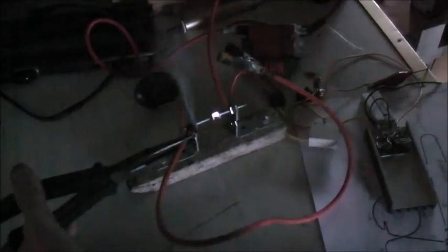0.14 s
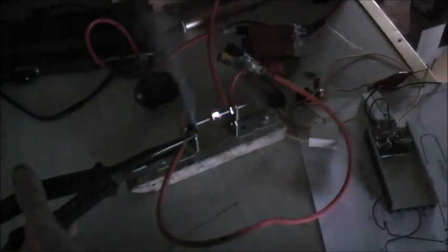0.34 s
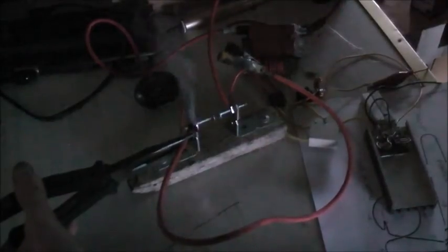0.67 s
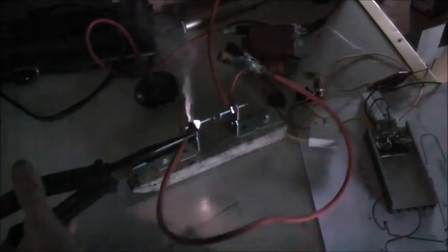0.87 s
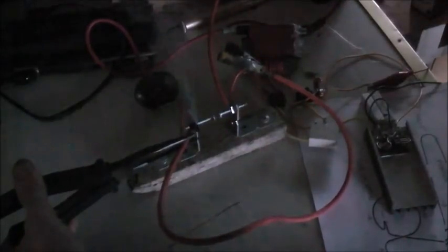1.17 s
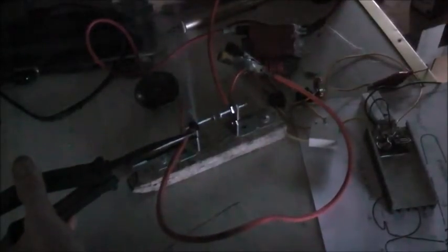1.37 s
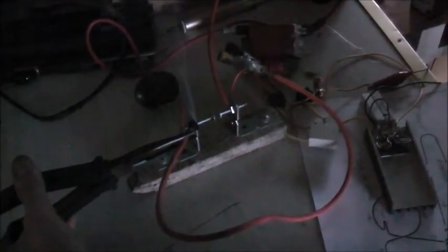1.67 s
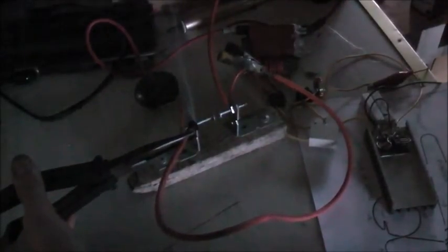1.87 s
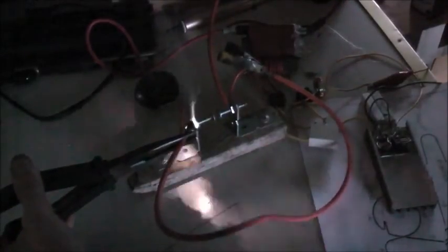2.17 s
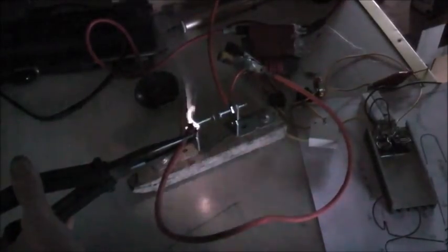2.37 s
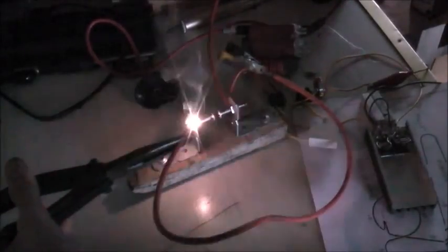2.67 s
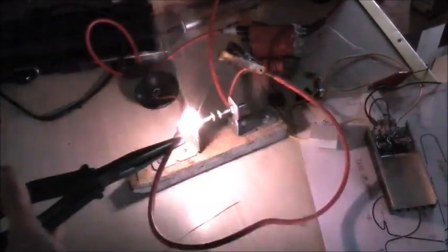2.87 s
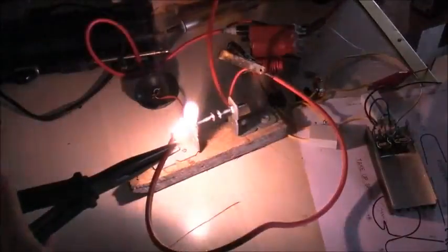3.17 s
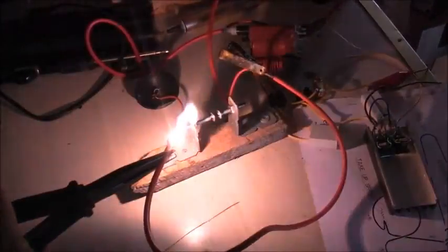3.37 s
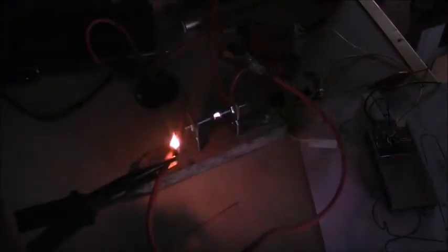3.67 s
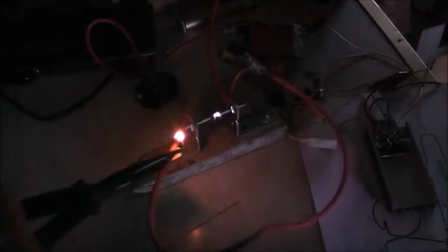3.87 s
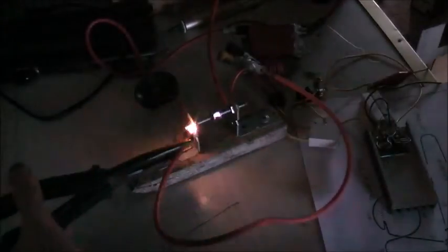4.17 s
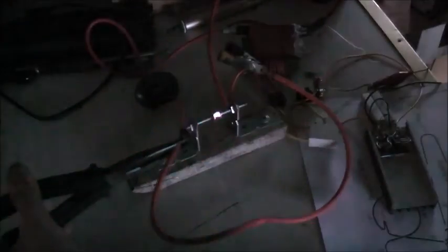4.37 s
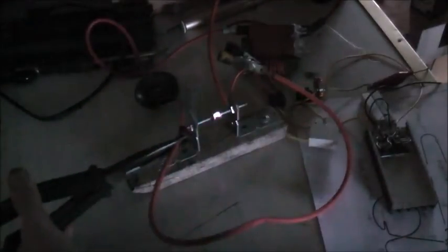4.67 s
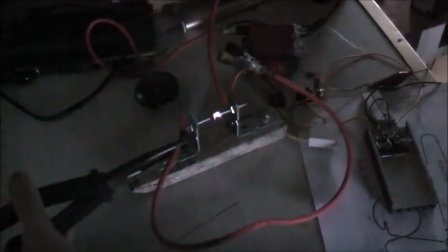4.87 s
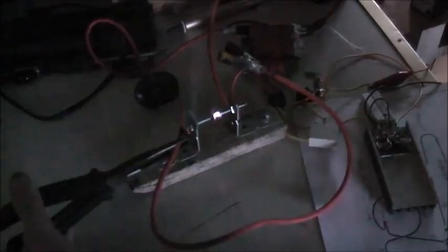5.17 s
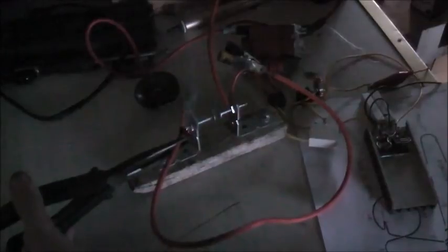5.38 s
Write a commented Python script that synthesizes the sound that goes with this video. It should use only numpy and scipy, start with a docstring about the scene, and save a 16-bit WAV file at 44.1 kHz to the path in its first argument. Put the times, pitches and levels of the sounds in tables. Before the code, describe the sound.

An electric arc held with tongs spits and crackles over a piercing steady whine, with pauses where only the whine, dull handling bumps and clinks remain. The whine cuts as a flame swells into a fierce fluttering hiss with snaps. Afterwards it is quiet, with tiny sparks and distant echoing bird whistles; one loud crack restarts sputter and whine. Small room, close microphone, dull background murmur.

```python
"""An electric arc on a workshop floor sputters in bursts, then burns as a roaring flame: flickering noise.
Its switched high-voltage supply whines while it runs: a gliding sine with overtones that beat.
Sparks snap as short noise bursts, and bumps by the operator's hand ring the housing's low modes.
Scuffs, clicks, clinks and faint leakage ticks join in; a far bird's falling, echoing whistles come
from outside, over a murmur of air and electronics."""
import sys
import numpy as np
from scipy import signal
from scipy.fft import rfft, irfft, next_fast_len
from scipy.io import wavfile
from scipy.ndimage import uniform_filter1d, map_coordinates

SR = 44100
rng = np.random.default_rng(int(sys.argv[2]) if len(sys.argv) > 2 else 0)


def wrap_up_sound(samples):
    """Save the sound to the file named by the first command line argument, as 16-bit audio."""
    columns = np.atleast_2d(samples).T
    # keep every value between -1 and 1, then stretch to whole-number steps
    tamed = np.clip(columns, -1, 1)
    steps = np.round(tamed * 32767).astype(np.int16)
    wavfile.write(sys.argv[1], SR, steps)


N = 244314  # length in samples

# Colour of the murmur: [f/Hz, level/dB per Hz]
AIR_TONE = [(20, -56), (47, -7), (267, -3.5), (453, -6.5), (1420, -15.5), (2600, -21.5), (7000, -23.5),
            (8800, -28), (9400, -21), (15600, -30.5)]
# Murmur level before its slow drift; it dips after the flame: [t/s, level/dB]
AIR_LEVEL = [(0, -53), (1.5, -51), (3.6, -52), (3.78, -55.5), (4.3, -54), (5.54, -50.5)]
# How alike the murmur is at left and right: [f/Hz, likeness 0 to 1]
AIR_LIKENESS = [(60, 0.58), (950, 0.19), (4000, 0.65), (15000, 1)]

# Relative strength of the leakage ticks: [t/s, level/dB]
CORONA_LEVEL = [(.45, -55), (.55, -68.5), (4.2, -66.5), (5.3, -57.5)]
# Colour of the leakage ticks: [f/Hz, level/dB per Hz]
CORONA_TONE = [(3000, -19), (4500, -3.5), (5800, 9.0), (7500, -8), (11000, -40)]

# Falling whistles, before husk and echo: [t/s, length/s, start f/Hz, end f/Hz, level/dB]
WHISTLES = [(-.13, 0.23, 2320, 1505, -45.5), (0.186, 0.16, 2318, 2017, -49),
            (0.392, 0.16, 2160, 1683, -52.5), (0.666, 0.13, 1800, 1490, -52.5),
            (0.765, 0.22, 2272, 1975, -50.5), (1.04, 0.18, 2224, 1926, -49),
            (1.252, 0.26, 2086, 1487, -45.5), (1.737, 0.24, 1977, 1383, -52.5),
            (2.289, 0.27, 2258, 1873, -48.5), (2.613, 0.14, 2240, 1690, -50.5),
            (2.941, 0.18, 2098, 1690, -51.5), (3.481, 0.079, 2050, 1900, -47),
            (3.768, 0.27, 2180, 1523, -52), (3.891, 0.2, 2118, 1882, -53), (4.37, 0.21, 2218, 1686, -56.5)]
LEAD_S = .2  # whistles that begin early bring their echo along

# Electrical breakdowns, before the path loss on the crack: [t/s, crack level/dB, pop level/dB against the crack]
SPARKS = [(.019, -37.5, -15), (0.168, -40, -25), (0.2172, -36, -34), (0.3329, -36.5, -28),
          (0.3511, -34, -33), (0.4675, -15.5, -16), (2.708, -27, -13), (3.0264, -35.5, 2.5),
          (3.125, -37, 2.5), (3.5569, -21.5, -2), (3.6569, -21, 1), (3.936, -40, -13.5), (4.37, -40.5, -29),
          (4.4051, -42.5, 1), (4.5086, -36.5, -29.5), (4.936, -36.5, -16), (5.055, -35.5, -30),
          (5.299, -33.5, -31), (5.324, -18, -11.5)]
# Colour of crack and fizz: [f/Hz, level/dB per Hz]
SNAP_TONE = [(2500, -25.5), (4000, -7.5), (5700, -1), (6600, -4.5), (8800, -2), (9500, -1.5),
             (11500, -12.5), (16500, -13)]
# Colour of the duller pop: [f/Hz, level/dB per Hz]
POP_TONE = [(60, -32), (250, -2), (900, -9.5), (1400, -1.5), (3000, -2), (5000, -17.0)]
CRACK_T60_S, FIZZ_T60_S, POP_T60_S = 0.014, 0.076, 0.037  # times to fade by 60 dB
FIZZ_DB = -10  # against the crack

# Soft knocks, before each one's random changes: [t/s, level/dB, extra level/dB of the mode near 163 Hz]
BUMPS = [(0.473, -25.5, -5.5), (0.558, -34.5, -32), (.668, -39.5, -12), (0.764, -41, -22),
         (1.198, -36.5, -21), (1.259, -39.5, -20), (1.324, -27.5, -18), (1.383, -29.5, -16),
         (1.426, -38.5, -13), (1.469, -33.5, -16), (1.557, -30.5, -26), (1.873, -35, -22),
         (2.066, -31, -25), (2.145, -34.5, -31), (2.192, -32, -37), (2.219, -31, -37), (5.345, -30, -13),
         (5.396, -24.5, -6), (5.463, -34, -6), (5.496, -40, -19)]
# Ringing modes of the housing: [f/Hz, width/Hz, level/dB, left over right/dB]
HOUSING_MODES = [(86, 9.8, -12, -4), (163.4, 8.8, 8, -1), (268, 12.6, 0.5, 2.5), (364.4, 21.2, -5, 10.5),
                 (462, 48, -8.5, 6), (663, 68, -2.5, 1)]
# Dull noise of the contact: [f/Hz, level/dB per Hz]
THUD_TONE = [(50, -28), (150, 6.5), (350, 3.5), (900, -10), (1800, -21.5)]
THUD_DB, THUD_T60_S = -7.5, 0.15  # level against the bump; time to fade by 60 dB

# Supply switched on and off: [full swing t/s, off t/s]
RUNS = [(0.552, 2.7), (5.409, 5.52)]
GROWS_DB_PER_S, DIES_DB_PER_S = 1100, 480
# Switching rate, pulled down as the arc loads the supply: [t/s, f/Hz]
SWITCHING_RATE = [(.54, 14290), (.58, 14335), (.68, 14355), (.705, 14305), (.775, 14300), (.795, 14350),
                  (.87, 14275), (.93, 14298), (1.12, 14308), (1.17, 14255), (1.21, 14370), (1.245, 14305),
                  (1.275, 14382), (1.47, 14418), (2.0, 14427), (2.25, 14425), (2.275, 14335), (2.35, 14283),
                  (2.455, 14315), (2.485, 14243), (2.58, 14250), (2.66, 14228), (2.69, 14165), (5.4, 14245),
                  (5.47, 14240), (5.54, 14200)]
# Loudness of the core, before its small wobble: [switching f/Hz, level/dB]
CORE_LEVEL = [(14165, -29.5), (14235, -21.5), (14265, -23.5), (14305, -19), (14350, -20), (14385, -23),
              (14425, -22.5)]
# A faster clock sags too under heavy load: [switching f/Hz, clock f/Hz]
CLOCK_RATE = [(14250, 66250), (14345, 66560)]
# Overtones that beat with the clock: [whine multiple, clock multiple, level/dB before BEAT_LEVEL]
BEATS = [(4, 1, -3), (5, 1, -8), (9, 2, -9.5)]
# Beats against the whine: [switching f/Hz, single-clock level/dB, double-clock level/dB]
BEAT_LEVEL = [(14242, -33, -27), (14254, -32, -62), (14395, -33, -62), (14414, -31, -33)]

# Steady part of the sputter, one list per spell, before flicker and path loss: [t/s, level/dB]
SPUTTER = [
    [(.67, -43.5), (.9, -39), (1.07, -39), (1.2, -43), (1.3, -54)],
    [(2.25, -42), (2.5, -41), (2.58, -47.5), (2.7, -41.5)],
    [(5.33, -40), (5.4, -52.5), (5.45, -72), (5.47, -57), (5.54, -40)],
]
# Sudden spitting on top, before flicker and path loss: [t/s, level/dB, hold/s]
BURSTS = [(.672, -27.5, 0.0024), (.688, -35, 0.017), (.723, -31, 0.004), (.759, -33.5, 0.018),
          (.796, -37, 0.0096), (.848, -34.5, 0.026), (.922, -45, 0.041), (.958, -40.5, 0.04),
          (1.094, -34.5, 0.093), (1.233, -32.5, 0.017), (1.875, -33.5, 0.0031), (2.258, -25.5, 0.0093),
          (2.311, -31, 0.0075), (2.41, -42, 0.019), (2.44, -36, 0.038), (2.798, -33, 0.01),
          (2.815, -36, 0.0068), (2.893, -37, 0.0057), (2.961, -27.5, 0.0087), (5.356, -38, 0.025),
          (5.456, -34, 0.05), (5.51, -32.5, 0.017)]
# Steady part of the flame, before flicker and path loss: [t/s, hiss level/dB, roar level/dB against the hiss]
FLAME = [(2.66, -58, 1), (2.72, -40.5, -15), (2.95, -42, -0.5), (3.1, -39, -2.5), (3.18, -44.5, -5),
         (3.3, -33.5, -5), (3.66, -40, -1.5), (3.72, -50.5, 9), (3.77, -70, 1)]
# Swells of flame hiss, before flicker and path loss: [t/s, level/dB, hold/s]
SURGES = [(2.955, -38.5, 0.065), (3.199, -38, 0.16), (3.27, -34, 0.027), (3.292, -25.5, 0.033),
          (3.333, -24, 0.053), (3.388, -25.5, 0.047), (3.438, -23.5, 0.048), (3.515, -27.5, 0.036),
          (3.542, -21.5, 0.0086), (3.577, -21.5, 0.0069), (3.608, -24, 0.037)]
BURST_T60_S, SURGE_T60_S = 0.041, 0.083  # times to fade by 60 dB
# Colour of the sputter: [f/Hz, level/dB per Hz]
SPUTTER_TONE = [(1470, -21), (2500, -12), (3610, -14), (4290, -5.5), (4740, -8.5), (5990, 2), (6710, -4),
                (7360, 4), (8990, -5.5), (10100, 1.5), (12300, -11.5), (16000, -38)]
# Colour of the flame's hiss: [f/Hz, level/dB per Hz]
FLAME_TONE = [(1650, -34), (2800, -26), (4040, -8.5), (4600, -11.5), (5160, -1), (6200, -5.5), (6700, 2),
              (7200, -7.5), (8500, -4.5), (9500, -6.5), (11000, -20.5), (15600, -34)]
# Colour of the flame's roar: [f/Hz, level/dB per Hz]
ROAR_TONE = [(200, -24), (600, -9), (1500, -4), (3200, 0), (5000, -7.5)]

# Short dull scuffs: [t/s, level/dB]
SCUFFS = [(0.945, -47), (1.94, -39), (3.945, -42.5), (4.945, -48.5)]
# Colour of the scuffs: [f/Hz, level/dB per Hz]
SCUFF_TONE = [(950, -19), (1350, 8.5), (1500, -8), (2200, -5.5), (3200, -21)]
SCUFF_T60_S = 0.21  # time to fade by 60 dB

# Clicks of the clamp's jaws, before the strength of each mode: [t/s, level/dB]
CLICKS = [(1.321, -43.5), (2.228, -47)]
# Ringing modes of the jaws: [f/Hz, level/dB]
JAW_MODES = [(3970, 6), (5050, 6.5), (9780, 1)]
JAW_T60_S = 0.064  # time to fade by 60 dB

# A small metal part rings: [t/s, level/dB]
CLINKS = [(1.3224, -40.5), (1.408, -45.5), (1.553, -50), (2.2457, -46.5)]
METAL_HZ, METAL_T60_S = 1305, .17

# Echoes from floor, board and bench: [delay/s, gain]
ECHOES = [(.0007, -0.046), (.0017, -0.18), (.0033, 0.14), (.0058, 0.25), (.0094, -0.36)]
EAR_GAP_S = .000012  # echoes reach left and right this far apart, by turns either side first
TREBLE_LEANS_DB = 0.5  # hiss, left over right: the housing shades the right side
PATH_DB = -4  # the arc's treble loses this on its way to the microphone
# Left-right balance of the nearby sounds: [t/s, left over right/dB]
BALANCE = [(0, 2), (1.1, 0), (1.3, 2.5), (1.9, 2), (2.7, 0), (4, 0.5)]
# Echo fading time, before each source's scale: [f/Hz, time to fade by 60 dB/s]
ROOM_T60 = [(200, 0.46), (2000, 0.26), (10000, 0.037)]
TOP_HZ = 16688  # band limit of the microphone


def amp(db):
    """Turn decibels into gain."""
    return 10 ** (np.asarray(db) / 20)


def unit(x):
    """Scale a signal to rms 1."""
    return x / np.sqrt(np.mean(x ** 2) + 1e-20)


def along(points, hz):
    """Read (Hz, value) points on a log frequency axis."""
    f, v = np.transpose(points)
    return np.interp(np.log(hz + 1), np.log(f + 1), v)


def curve(rows, column, outside=None):
    """One value per sample, `outside` beyond the table, or its end values if none is given."""
    rows = np.asarray(rows)
    return np.interp(np.arange(N) / SR, rows[:, 0], rows[:, column], outside, outside)


def level(tables, column):
    """Gain of a source that sounds only during its tables, with softened edges."""
    gains = [amp(curve(rows, column, -200)) for rows in tables]
    return uniform_filter1d(np.max(gains, axis=0), size=90)


def wobble(rate):
    """A smooth random curve, with `rate` random knots a second."""
    knots = rng.standard_normal(int(N * rate / SR) + 4)
    return map_coordinates(knots, [np.arange(N) * rate / SR])


def filtered(x, response):
    """Filter x by a complex response of frequency."""
    m = next_fast_len(N + SR // 2)
    hz = np.fft.rfftfreq(m, 1 / SR)
    return irfft(rfft(x, m) * response(hz), m)[..., :N]


def noise(spectrum, drive=1):
    """Coloured noise, rms 1 if undriven; drive acts before the colour, so fast flicker keeps the resonances."""
    white = rng.standard_normal(N)
    both = np.array([white, drive * white])
    plain, driven = filtered(both, lambda hz: amp(along(spectrum, hz)))
    return driven / np.std(plain)


def add(track, s, sound):
    """Mix a sound in at s seconds."""
    start = round(s * SR)
    piece = sound[max(0, -start):N - start]
    track[max(0, start):][:len(piece)] += piece


def jumps(rows, rise, t60):
    """Gain that jumps on, holds and dies for each row."""
    out, t = np.zeros(N), np.arange(SR // 3) / SR
    for s, db, hold in rows:
        fade = amp(db - 60 * np.maximum(t - hold, 0) / t60)
        add(out, s, fade * (1 - np.exp(-t / rise)))
    return out


def room(x, t60_scale):
    """Echo x in a two-channel tail of noise, each frequency dying at its own speed."""
    hz, t, z = signal.stft(rng.standard_normal((2, SR // 2)), SR, nperseg=256)
    t60 = t60_scale * along(ROOM_T60, hz)
    tail = signal.istft(z * amp(-60 * t / t60[:, None]), SR, nperseg=256)[1]
    return signal.fftconvolve(x[None], tail / np.linalg.norm(tail[0]), axes=1)[:, :N]


def air():
    """Gently drifting workshop murmur of air and electronics, partly shared by left and right."""
    def mid_side(hz):
        angle = np.arccos(np.clip(along(AIR_LIKENESS, hz), -1, 1)) / 2
        return amp(along(AIR_TONE, hz)) * [np.cos(angle), np.sin(angle)]

    mid, side = filtered(rng.standard_normal((2, N)), mid_side)
    return amp(curve(AIR_LEVEL, 1) + 1.3 * wobble(7)) * unit(np.array([mid + side, mid - side]))


def corona():
    """Faint leakage ticks at random moments, each a tiny puff of treble noise."""
    happens = rng.random(N) < 110 / SR  # about 110 a second
    strikes = happens * amp(2.2 * rng.exponential(size=N))
    fade = amp(-60 * np.arange(SR // 20) / SR / 0.047)
    puffs = signal.fftconvolve(strikes, fade)[:N]
    return amp(curve(CORONA_LEVEL, 1)) * puffs * noise(CORONA_TONE)


def bird():
    """Each husky whistle falls slowly at first, then faster; distance leaves mostly echo."""
    out, lead = np.zeros(N), round(LEAD_S * SR)
    for s, length, start_hz, end_hz, db in WHISTLES:
        u = np.arange(round(length * SR)) / (length * SR)  # progress, 0 to 1
        hz = start_hz + (end_hz - start_hz) * u ** 1.4
        swell = np.abs(np.sin(np.pi * u)) ** 0.33
        add(out, s + LEAD_S, amp(db) * swell * np.sin(2 * np.pi * np.cumsum(hz) / SR))
    out = out * (.8 + .38 * wobble(130))  # husky flutter
    echo = room(out, t60_scale=2.77)
    mixed = 0.5 * out + 0.5 * echo + 0.6 * echo[0]
    return np.pad(mixed[:, lead:], [(0, 0), (0, lead)])


def sparks():
    """Each breakdown is a sudden crack and a burst of bright noise; a short duller pop lies under it."""
    snap, pop, t = np.zeros(N), np.zeros(N), np.arange(SR // 4) / SR
    for s, db, pop_db in SPARKS:
        crack = amp(db - 60 * t / CRACK_T60_S)
        fizz = amp(db + FIZZ_DB - 60 * t / FIZZ_T60_S)
        add(snap, s, crack + fizz)
        add(pop, s, amp(db + pop_db - 60 * t / POP_T60_S))
    return snap * noise(SNAP_TONE), pop * noise(POP_TONE)


def bumps():
    """Soft knocks ring the low modes of the housing, each at a new strength, pitch and phase."""
    rings, thuds, t = np.zeros((2, N)), np.zeros(N), np.arange(SR // 2) / SR
    for s, db, low_db in BUMPS:
        ring = 0
        for hz, width, mode_db, lean in HOUSING_MODES:
            extra = low_db if 130 < hz < 200 else 0
            sides = np.array([[lean], [-lean]]) / 2
            gain = amp(mode_db + rng.normal(0, 1.3) + extra + sides)
            turns = hz * rng.normal(1, 0.019) * t + rng.random()
            ring = ring + gain * np.exp(-np.pi * width * t) * np.sin(2 * np.pi * turns)
        add(rings.T, s, (amp(db) * ring * (1 - np.exp(-t / 0.018))).T)
        add(thuds, s, amp(db + THUD_DB - 60 * t / THUD_T60_S) * (1 - np.exp(-t / 0.0068)))
    lumps = amp(1.65 * wobble(45))  # the grip shifts, so the ring comes in lumps
    return (rings + thuds * noise(THUD_TONE)) * lumps


def sputtering():
    """How hard the unsteady arc spits: a steady part plus sudden bursts."""
    return level(SPUTTER, 1) + jumps(BURSTS, rise=0.00026, t60=BURST_T60_S)


def whine():
    """The core sings at the switching rate, rougher while the arc spits; overtones beat with a faster clock."""
    hz, t = curve(SWITCHING_RATE, 1), np.arange(N) / SR

    def by_rate(rows, column):
        return np.interp(hz, *np.transpose(rows)[[0, column]])

    rough = 0.052 + 6 * sputtering()
    turns = np.cumsum(hz) / SR
    clock = np.cumsum(by_rate(CLOCK_RATE, 1)) / SR
    jitter = rough * (wobble(500) + 0.18 * wobble(2200))
    tone = np.sin(2 * np.pi * turns + jitter) * (1 + 0.83 * rough * wobble(640))
    beats = sum(amp(db + by_rate(BEAT_LEVEL, n)) * np.sin(2 * np.pi * (m * turns - n * clock))
                for m, n, db in BEATS)
    running = 0
    for on, off in RUNS:
        growing = GROWS_DB_PER_S * np.maximum(on - t, 0)
        dying = DIES_DB_PER_S * np.maximum(t - off, 0)
        running = running + amp(-growing - dying)
    loudness = amp(by_rate(CORE_LEVEL, 1) + 0.21 * wobble(29.4))
    return np.sqrt(2) * running * loudness * (tone + beats)


def arc():
    """The channel of hot gas flickers fast, making coloured noise; the sputter and flame flicker differently."""
    spikes = unit(amp(1.9 * wobble(120) + 2.7 * wobble(900)))
    sputter = noise(SPUTTER_TONE, sputtering() * spikes)
    flicker = amp(1.47 * wobble(70) + 2.9 * wobble(800))
    steady = level([FLAME], 1)
    surges = jumps(SURGES, rise=0.0044, t60=SURGE_T60_S)
    hiss = noise(FLAME_TONE, flicker * (steady + surges))
    roar = noise(ROAR_TONE, flicker * steady * amp(curve(FLAME, 2)))
    return sputter + hiss + roar


def scuffs():
    """Short dull scuffs are fading puffs of noise."""
    puffs, t = np.zeros(N), np.arange(SR // 4) / SR
    for s, db in SCUFFS:
        add(puffs, s, amp(db - 60 * t / SCUFF_T60_S) * (1 - np.exp(-t / 0.0042)))
    return puffs * noise(SCUFF_TONE)


def jaw_clicks():
    """A dry click of noise and the short high modes of the clamp's jaws."""
    out, t = np.zeros(N), np.arange(SR // 10) / SR
    for s, db in CLICKS:
        modes = sum(amp(g) * np.sin(2 * np.pi * hz * t) for hz, g in JAW_MODES)
        ring = modes + rng.standard_normal(len(t))
        add(out, s, amp(db - 60 * t / JAW_T60_S) * ring * (1 - np.exp(-t / 0.0018)))
    return out


def clinks():
    """A small metal part rings briefly as a fading, slightly uneven sine."""
    out, t = np.zeros(N), np.arange(SR // 4) / SR
    for s, db in CLINKS:
        ring = np.sin(2 * np.pi * METAL_HZ * t)
        add(out, s, amp(db - 60 * t / METAL_T60_S) * ring * (1 - np.exp(-t / 0.0027)))
    return out * (1 + 0.34 * wobble(90))


def near_surfaces(hz):
    """Short echoes comb the hiss with fine ripples, a little differently at left and right."""
    side = np.array([[1], [-1]])  # left, right
    paths = 1
    for k, (delay, gain) in enumerate(ECHOES):
        shifted = delay + (-1) ** k * side * EAR_GAP_S / 2
        paths = paths + gain * np.exp(-2j * np.pi * hz * shifted)
    return amp(side * TREBLE_LEANS_DB / 2) * paths


def scene():
    """Mix the near sounds, their room echoes, the bird and the murmur in stereo."""
    lean = curve(BALANCE, 1) / 2
    snaps, pops = sparks()
    hiss = amp(PATH_DB) * (arc() + snaps + corona())
    bench = filtered(hiss, near_surfaces) + pops + scuffs() + jaw_clicks() + clinks()
    bench_echo = amp(-14.0) * room(bench.mean(axis=0), t60_scale=0.49)
    near = (bench + whine()) * amp([lean, -lean]) + bench_echo
    knocks = bumps()
    # small panels answer only the upper modes
    rattle = filtered(knocks.mean(axis=0), lambda hz: 1 / (1 + (220 / (hz + 1)) ** 6))
    return near + knocks + amp(-7.5) * room(rattle, t60_scale=0.69) + bird() + air()


def record(dry):
    """Peaks are softly squashed; the microphone fades in the top treble and keeps nothing above its limit."""
    squashed = dry / (1 + np.abs(dry / .4) ** 4) ** .25
    return filtered(squashed, lambda hz: (hz < TOP_HZ) / (1 + (hz / 15700) ** 60))


dry = scene()
out = record(dry)
wrap_up_sound(out)
```